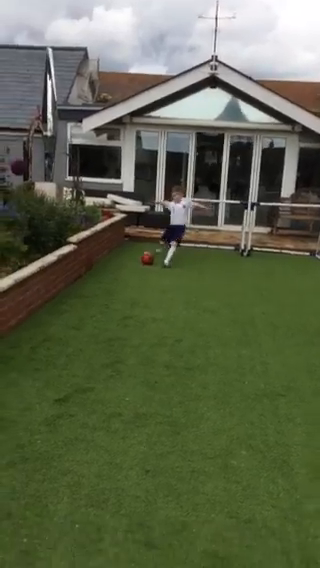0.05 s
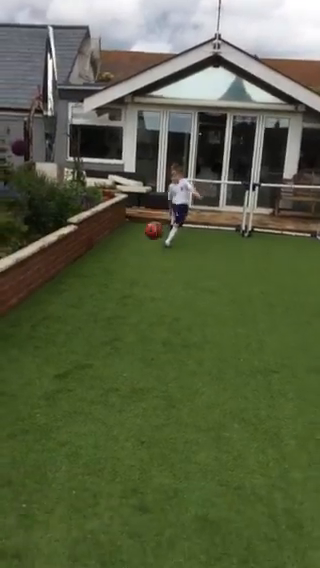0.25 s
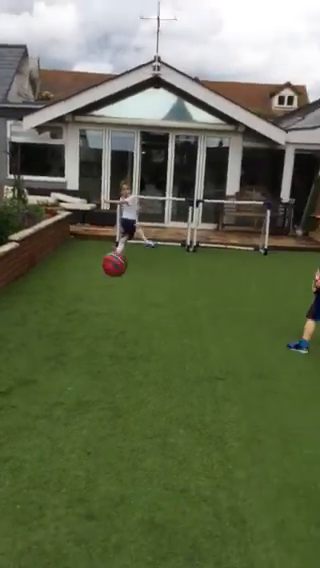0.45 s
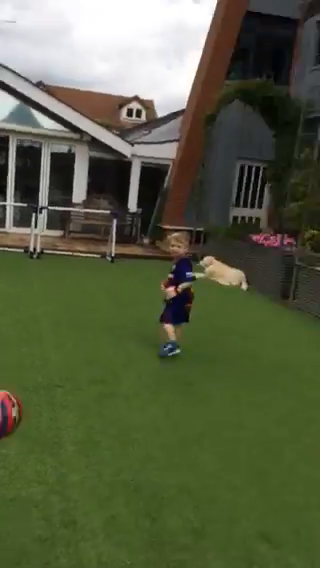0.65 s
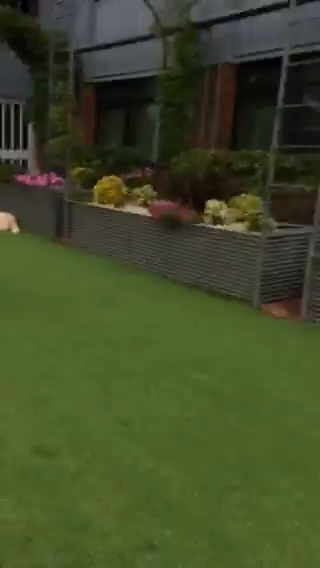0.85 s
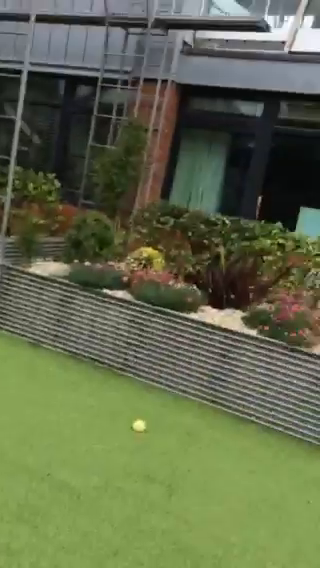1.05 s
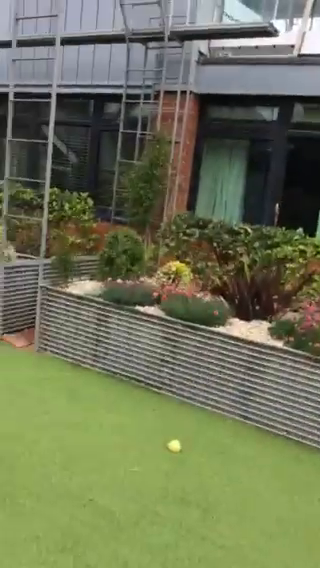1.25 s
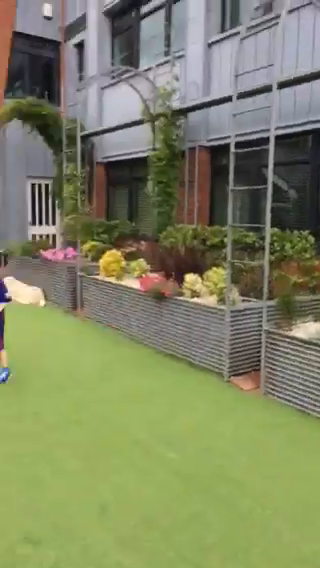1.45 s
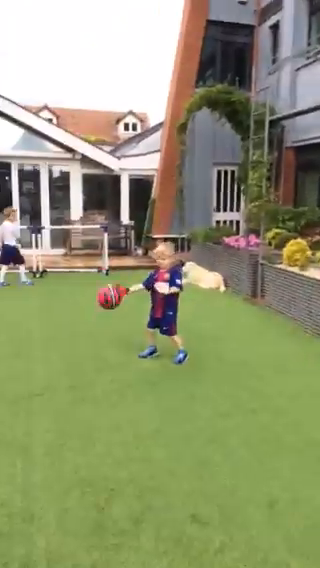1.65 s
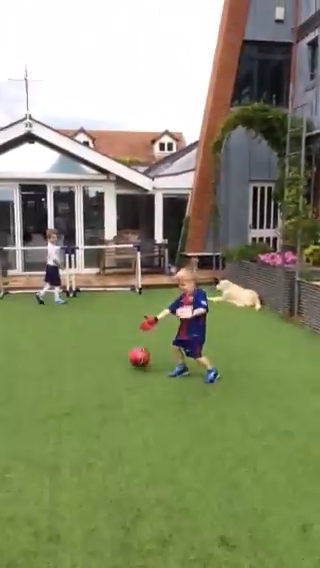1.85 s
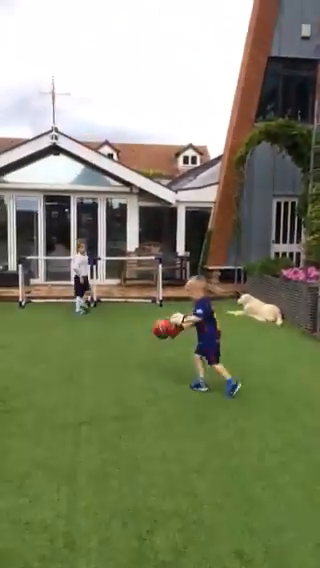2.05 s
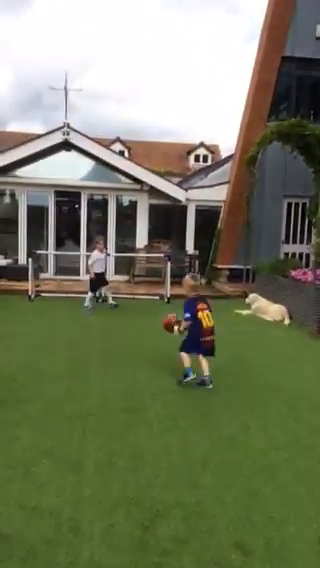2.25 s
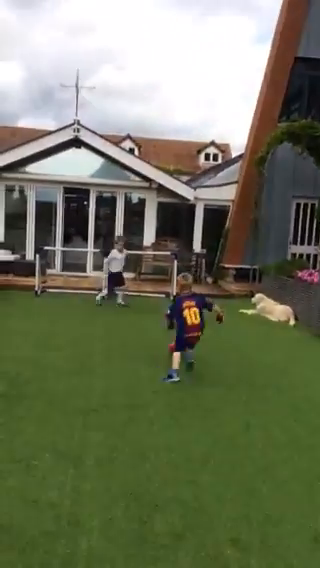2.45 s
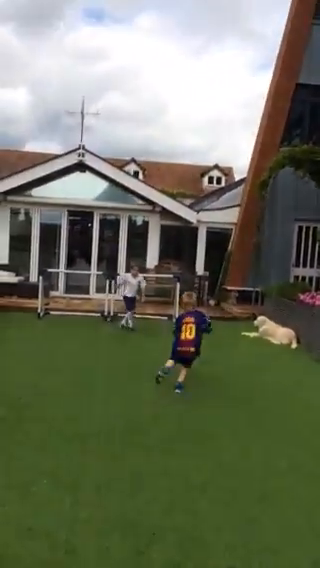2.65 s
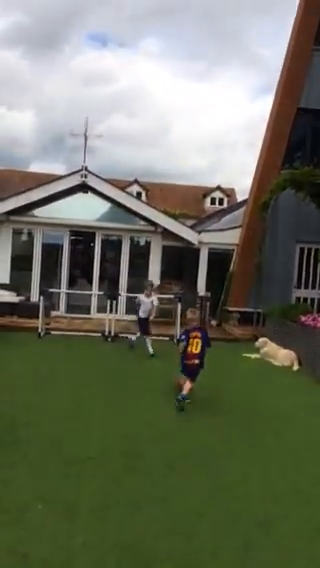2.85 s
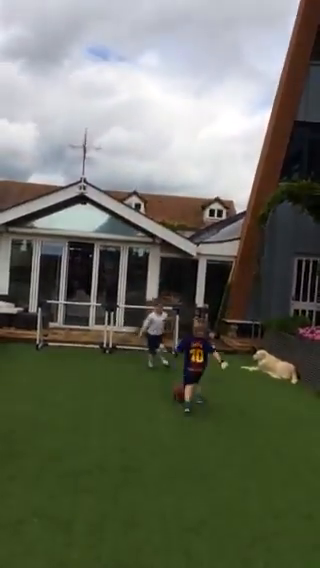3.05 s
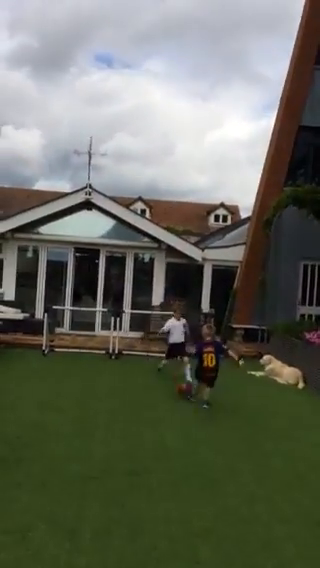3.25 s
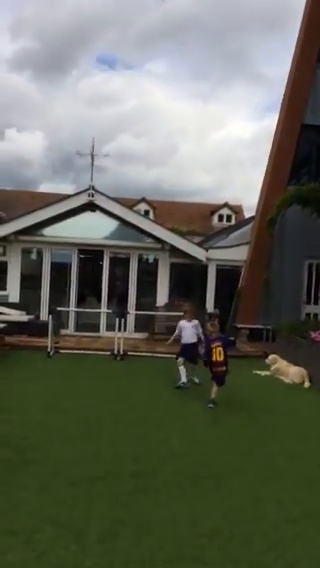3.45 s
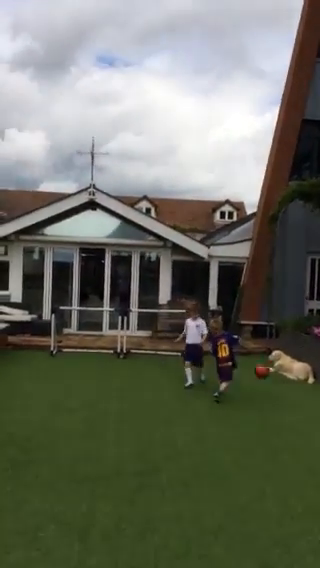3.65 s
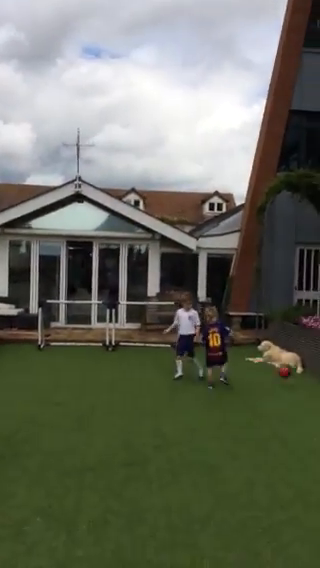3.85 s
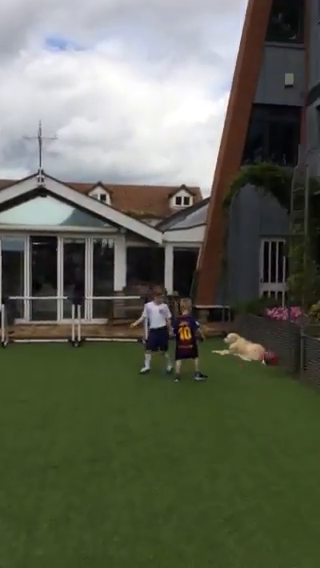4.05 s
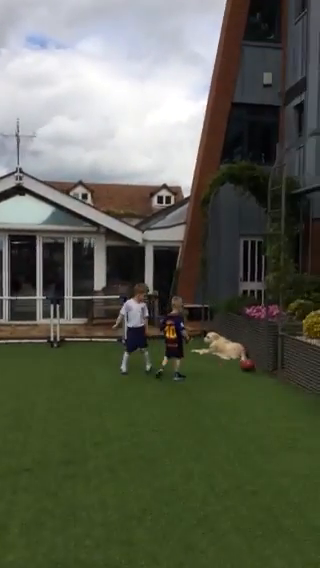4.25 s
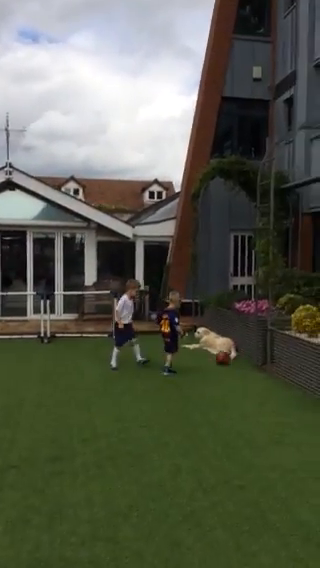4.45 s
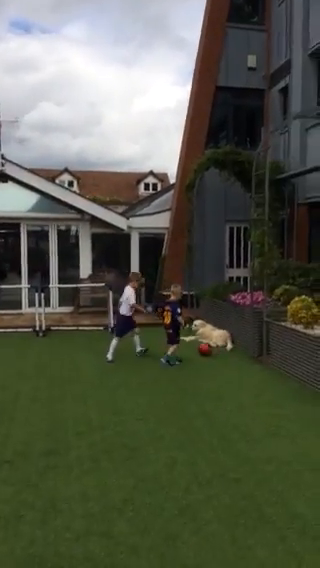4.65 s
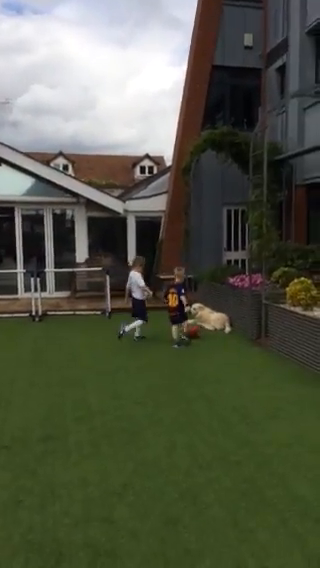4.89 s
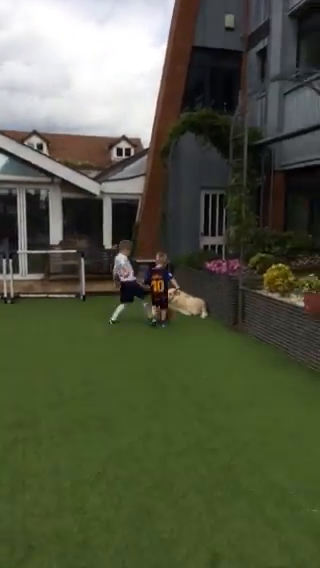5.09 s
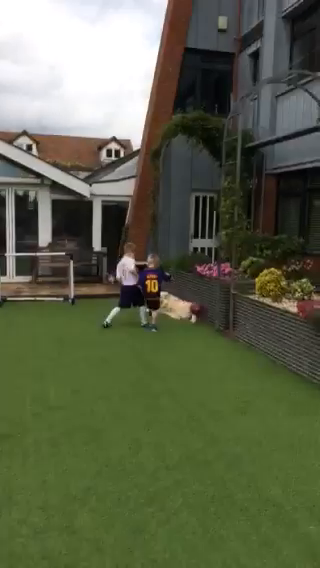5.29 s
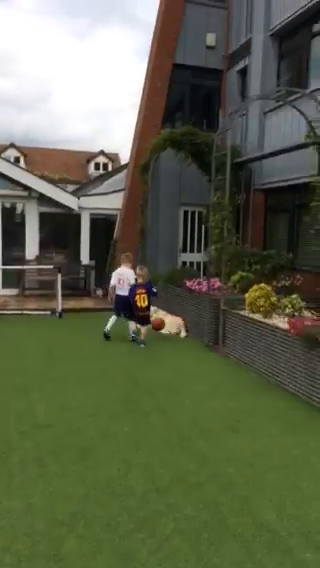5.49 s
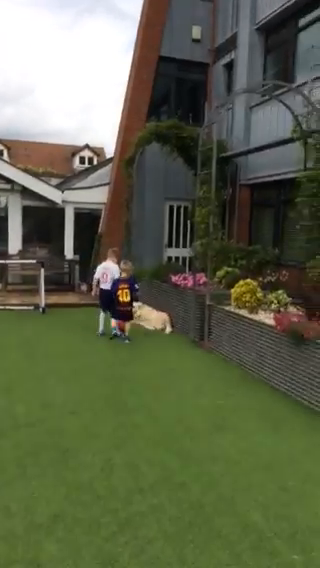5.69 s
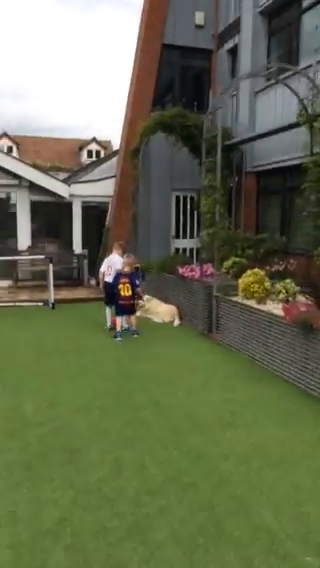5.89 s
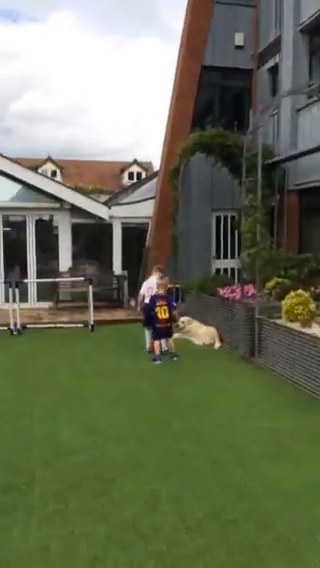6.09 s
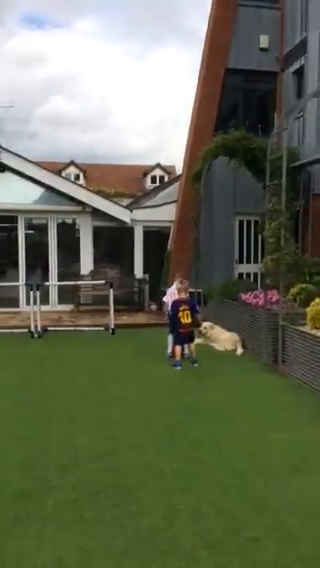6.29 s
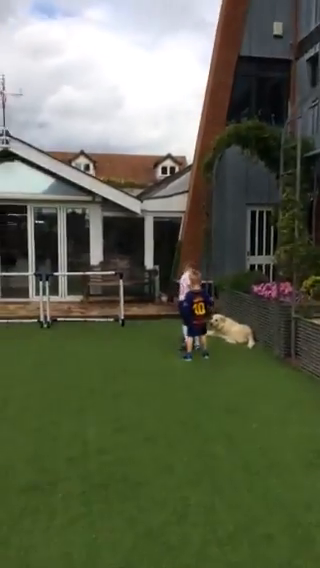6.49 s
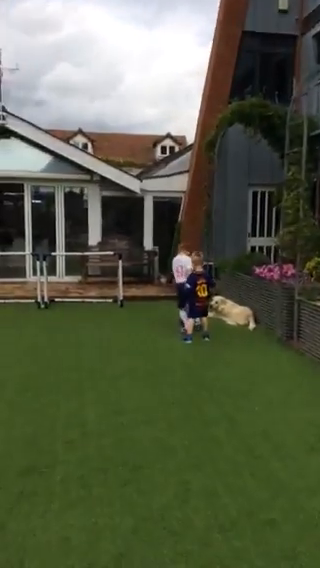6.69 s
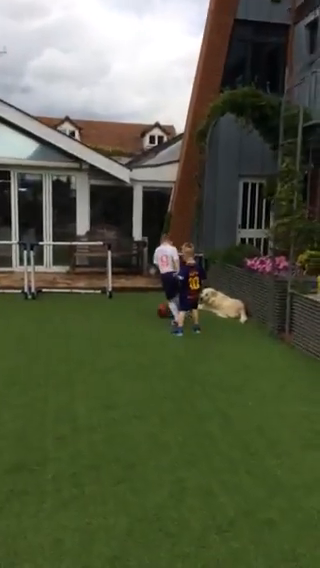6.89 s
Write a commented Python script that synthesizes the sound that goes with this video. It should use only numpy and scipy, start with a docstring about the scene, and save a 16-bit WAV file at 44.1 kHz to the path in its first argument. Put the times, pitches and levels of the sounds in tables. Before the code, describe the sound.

Hollow ball thumps and slaps on padded turf, the loudest about one second in, with light footsteps, scuffs and a distant chirping bird.

```python
"""Ball play in a walled garden

Children knock a small football about on artificial grass, heard through a hand-held phone.
Each kick adds a damped low thump, a slap of skin smacks and noise, and the ringing modes of the ball's air.
A filtered wall echo and decaying noise answer it, and enveloped low noise holds a rumble.
Feet pad as soft pulses and scuff as swells of grainy noise; a far bird sings in gliding sines
over a hush of shaped noise, with faint stray ticks of clothes and leaves."""
import sys
import numpy as np
from scipy import signal
from scipy.fft import rfft, irfft, next_fast_len
from scipy.io import wavfile

SR = 44100
rng = np.random.default_rng(int(sys.argv[2]) if len(sys.argv) > 2 else 0)


def waveform_to_disk(signal):
    """Save audio, clipped to [-1, 1], as 16-bit WAV at the path in sys.argv[1]."""
    frames = np.transpose(np.atleast_2d(signal))
    scaled = np.clip(frames, -1, 1) * 32767
    samples = np.round(scaled).astype(np.int16)
    wavfile.write(sys.argv[1], SR, samples)


N = 305613
TIME = np.arange(N) / SR  # s


def undb(db):
    """Level law: decibels to amplitude gain."""
    return 10 ** (np.asarray(db) / 20)


def unit(x):
    """Normalisation: scale to an rms of 1."""
    return x / np.sqrt(np.mean(x ** 2))


def log_interp(hz, points_hz, values):
    """Logarithmic pitch scale: read a curve on a log-frequency axis."""
    return np.interp(np.log(np.maximum(hz, 1)), np.log(points_hz), values)


def colour(x, points):
    """Linear filtering: weight the spectrum by a curve of (frequency [Hz], gain [dB])."""
    size = next_fast_len(len(x))
    hz = np.fft.rfftfreq(size, 1 / SR)
    gain = undb(log_interp(hz, *np.transpose(points)))
    return irfft(rfft(x, size) * gain, size)[:len(x)]


def click(db):
    """Minimum phase: the causal impulse that has a given level in each frequency bin."""
    cepstrum = irfft(np.log(undb(db)))
    half = len(cepstrum) // 2
    # folding the cepstrum onto positive times makes the impulse causal
    cepstrum[1:half] *= 2
    cepstrum[half + 1:] = 0
    return irfft(np.exp(rfft(cepstrum)))


def fade(t, t60):
    """Exponential decay: 60 dB are lost in t60 seconds."""
    return np.exp(-np.log(1000) * t / t60)


def add(out, s, x):
    """Superposition: mix x into out from time s on."""
    start = int(np.clip(s * SR, 0, len(out)))
    part = x[:len(out) - start]
    out[start:start + len(part)] += part


def walk(rate):
    """Random modulation: normal values, rate of them per second, joined by straight lines."""
    knots = rng.standard_normal(N // 100)
    return np.interp(TIME * rate, np.arange(len(knots)), knots)


def scattered(per_second):
    """Jittered succession: one time drawn at random within each equal slot."""
    slots = np.arange(int(N / SR * per_second))
    return (slots + rng.random(len(slots))) / per_second


# reverberation of the yard: (band centre [Hz], relative level [dB], late decay t60 [s])
YARD_BANDS = [(63.6, 10.5, 0.97), (145, -2, 0.76), (324, 1.5, 0.32), (988, -6.5, 0.6), (3080, -4, 0.3),
              (7000, -9, .3), (14000, -6.5, .22)]


def yard(build_s=0.0048, early_db=3, early_t60=0.32):
    """Diffuse reverberation: scatter from planters and house fronts builds up, then decays band by band."""
    t = TIME[:SR]
    hz = np.fft.rfftfreq(SR, 1 / SR)
    centres, levels, t60s = np.transpose(YARD_BANDS)
    noise = rfft(rng.standard_normal(SR))
    out = np.zeros(SR)
    for share, db, t60 in zip(np.eye(len(YARD_BANDS)), levels, t60s):
        build_up = 1 - np.exp(-(t / build_s) ** 2)
        decay = fade(t, t60) + undb(early_db) * fade(t, early_t60)
        shape = build_up * decay
        band = irfft(noise * log_interp(hz, centres, share), SR)  # neighbouring bands overlap
        out += undb(db) * band * shape / np.linalg.norm(shape)
    return out


# spectrum of the distant hush: (frequency [Hz], relative density [dB])
HUSH_SPECTRUM = [(15, -36), (25, 7), (58, 4), (157, -8), (263, -2), (326, -9.5), (545, -14), (677, -12.5),
                 (1040, -15), (1290, -15), (2760, -20.5), (6380, -27), (9070, -32), (14800, -32),
                 (16000, -43.5)]
# slow course of the hush: (time [s], level relative to HUSH_DB [dB])
HUSH_COURSE = [(0, 0.5), (0.6, 3), (1.3, -1), (2.4, 2.1), (3.0, 0.5), (4.1, -1.45), (4.9, 0.6), (6.1, -0.8),
               (6.9, 1.5)]
HUSH_DB = -61


def outdoors(sway_db=-0.4, treble_sway_db=1, treble_hz=2500):
    """Ambient noise: a distant hush slowly swells and thins, and its treble also wanders alone."""
    level_db = HUSH_DB + np.interp(TIME, *np.transpose(HUSH_COURSE)) + sway_db * walk(3)
    hush = unit(colour(rng.standard_normal(N), HUSH_SPECTRUM))
    high_pass = signal.butter(2, treble_hz, "high", fs=SR, output="sos")
    treble = signal.sosfiltfilt(high_pass, hush)
    rest = hush - treble
    return (rest + treble * undb(treble_sway_db * walk(7.5))) * undb(level_db)


# spectrum of the low air noise: (frequency [Hz], relative density [dB])
AIR_SPECTRUM = [(20, -8), (45, 14), (70, -3), (120, -2.5), (200, -24), (400, -58.5), (1000, -76.5),
                (4000, -96)]
# gusts on the microphone as the phone swings: (middle [s], half length [s], level [dB])
MICROPHONE_GUSTS = [(0.109, 0.038, -41.5), (0.738, 0.042, -39.5), (2.15, 0.3, -58), (2.56, 0.07, -44),
                    (3.211, 0.056, -43)]
RUMBLE_FLOOR_DB = -68.5  # always faintly there
# held between the walls after each thump; the level is relative to the thump's
RUMBLE_HELD_DB, RUMBLE_BUILD_S, RUMBLE_T60_S = -25, 0.031, 0.8


def rumble(flutter_db=2, thud_db=3, yard_share=0.29):
    """Energy addition: powers of floor, gusts and what thumps stir up add, and drive one fluttering noise."""
    t = TIME[:2 * SR]
    held = (1 - np.exp(-t / RUMBLE_BUILD_S)) * fade(t, RUMBLE_T60_S)
    # a kick that the yard answers strongly holds more rumble
    thumps = [(s, db + yard_share * yard_db) for s, db, *_, yard_db, echo_s in KICK_EVENTS]
    thumps += [(s, db + thud_db) for s, db, _ in SOFT_LANDINGS]
    power = np.full(N, undb(RUMBLE_FLOOR_DB) ** 2)
    for s, half_s, db in MICROPHONE_GUSTS:
        power += undb(db) ** 2 * np.exp(-((TIME - s) / half_s) ** 2)
    for s, db in thumps:
        add(power, s, (undb(db + RUMBLE_HELD_DB) * held) ** 2)
    air = unit(colour(rng.standard_normal(N), AIR_SPECTRUM))
    return air * np.sqrt(power) * undb(flutter_db * walk(60))


def rustle(per_second=9, db=-52, spread_db=3, yard_db=0):
    """Random impulses: clothes and leaves give off faint stray ticks of either sign, with reverberation."""
    chance = rng.standard_normal((2, N))
    happens = rng.random(N) < per_second / SR
    ticks = happens * np.sign(chance[0]) * undb(db + spread_db * chance[1])
    ticks = ticks + undb(yard_db) * signal.fftconvolve(ticks, yard())[:N]
    return colour(ticks, [(200, -4.5), (1200, 4.5), (4000, 2.0), (14000, 0)])


def thump(hz, t60=0.05, punch=0.82, punch_s=0.0016, squash=0.45):
    """Impact radiation: a quick squash and rebound makes a pressure pulse and a heavily damped low swing."""
    t = TIME[:SR // 4]
    u = t / punch_s - 2
    rebound = (1 - 2 * squash * u ** 2) * np.exp(-u ** 2 / 2) * (1 - np.exp(-t / 0.00016))
    swing = np.sin(2 * np.pi * hz * t) * fade(t, t60) * (1 - np.exp(-t / 0.0018))
    return swing + punch * rebound


# heavy footfalls and soft bounces: (time [s], thump level [dB], knock relative to thump [dB])
SOFT_LANDINGS = [(.494, -34, -24), (0.672, -45, 4), (.694, -29.5, -21), (0.736, -27.5, -34),
                 (0.865, -30, -16), (.89, -30, -24.5), (0.961, -31.5, 0), (1.156, -15, -9),
                 (2.546, -36, -36), (3.704, -40, -1), (3.891, -30, -16.5), (5.505, -30.5, -29)]
THUD_HZ = 84  # the padded turf gives every landing the same low note
# light steps: the children run at first, then settle round the ball, so that the level falls steadily
STEPS_PER_S, STEP_DB, SETTLE_DB_PER_S = 5.1, -43, -2.5
STEP_SPREAD_DB, STEP_KNOCK_DB = 2, -24.5


def thuds(steps, yard_db=-11, usual_db=-32, nearness=0.55, knock_s=0.00074, knock_after_s=0.0025):
    """Cushioned impact: a thump, and a dull knock where the pile bottoms out; loud ones are near and dry."""
    out, scatter = np.zeros((2, N))
    u = (TIME[:SR // 4] - knock_after_s) / knock_s
    knock = (1 - u ** 2) * np.exp(-u ** 2 / 2)
    body = thump(THUD_HZ, t60=0.082, punch=0.52, punch_s=0.0018, squash=0.14)
    light = []
    for s in steps:
        step_db = STEP_DB + SETTLE_DB_PER_S * s + STEP_SPREAD_DB * rng.standard_normal()
        light.append((s, step_db, STEP_KNOCK_DB))
    for s, db, knock_db in SOFT_LANDINGS + light:
        landing = undb(db) * (body + undb(knock_db) * knock)
        add(out, s, landing)
        add(scatter, s, undb(yard_db - nearness * max(db - usual_db, 0)) * landing)
    return out + signal.fftconvolve(scatter, yard())[:N]


# spectrum of brushed turf before the tilt of each scuff: (frequency [Hz], relative density [dB])
TURF_SPECTRUM = [(100, -19), (230, 2.5), (370, 5), (600, 0), (1200, 2), (2200, -5), (4000, -11.5),
                 (8000, -20), (15000, -23.5)]
# shoes and ball brushing the turf:
# (time [s], rise [s], fade to 1/e [s], direct level [dB], brightness tilt [dB per octave])
TURF_SCUFFS = [(.11, 0.038, 0.083, -59.5, 0), (.452, .01, 0.056, -56, 2), (.667, 0.0061, 0.036, -63, 1),
               (.788, 0.0048, 0.031, -50, -0.5), (0.945, 0.0057, 0.0076, -29, -1),
               (1.412, 0.028, 0.066, -52, -0.9), (3.095, 0.015, 0.015, -56, 3.5),
               (3.893, .0026, 0.0085, -55, 0), (4.2843, 0.0015, 0.0046, -47, 4),
               (5.135, .002, .004, -50.5, 3), (5.146, .006, 0.03, -52.5, 2), (5.493, 0.0043, 0.016, -53, 0),
               (5.95, .06, 0.067, -60.5, -.5), (6.346, 0.0011, .011, -56.5, 0.5)]
# the brush of each light step
STEP_BRUSH_DB, STEP_BRUSH_RISE_S, STEP_BRUSH_FADE_S, STEP_BRUSH_TILT_DB = -70.5, 0.014, 0.055, 2


def scuffs(steps, yard_db=-8, grain_db=4.5, tuft_db=2.5):
    """Friction noise: plastic blades flick past a sole in a short swell of uneven grains that come in tufts."""
    out, t = np.zeros(N), TIME[:SR // 2]
    light = []
    for s in steps:
        brush_db = STEP_BRUSH_DB + STEP_SPREAD_DB * rng.standard_normal()
        light.append((s, STEP_BRUSH_RISE_S, STEP_BRUSH_FADE_S, brush_db, STEP_BRUSH_TILT_DB))
    for s, rise_s, fade_s, db, tilt_db in TURF_SCUFFS + light:
        grain_sizes = np.repeat(rng.standard_normal(len(t)), 20)[:len(t)]  # each lasts 20 samples
        tufts = walk(156.9)[:len(t)]
        sizes = undb(grain_db * grain_sizes + tuft_db * tufts)
        tilted = [(hz, level + tilt_db * np.log2(hz)) for hz, level in TURF_SPECTRUM]
        grains = colour(sizes * rng.standard_normal(len(t)), tilted)
        swell = np.minimum(t / rise_s, 1) * np.exp(-np.maximum(t - rise_s, 0) / fade_s)
        add(out, s, undb(db) * unit(grains) * swell)
    return out + undb(yard_db) * signal.fftconvolve(out, yard())[:N]


# modes of the ball's shell and the air inside it: (mean frequency [Hz], relative level [dB], t60 [s])
BALL_MODES = [(368, 2, 0.039), (840, -9.5, 0.052), (1316, 3, 0.038), (2110, -3, 0.016), (2607, 2, 0.032),
              (3400, -17.5, 0.027), (4425, -11, 0.0092)]
# spectrum of the slap before the hardness of each blow: (frequency [Hz], gain [dB])
SLAP_SPECTRUM = [(100, -14), (250, 7.5), (450, 6), (750, 13), (1400, 8), (2000, 4.5), (4500, 0),
                 (8000, -0.5), (11000, -7.5), (16000, -17.5)]


def slap(knock_db, bite_db, sizzle_db, smack_s, weaker=0.72, slower=1.25, ping_db=-37,
         crush_db=-22, crush_t60=0.014, count=4):
    """Modal excitation: the skin smacks flat, crushes grass blades and rings the air in the ball."""
    t = TIME[:SR // 4]
    hit = undb(crush_db) * rng.standard_normal(len(t)) * fade(t, crush_t60)
    for k in range(count):  # each smack is weaker and comes after a longer gap
        add(hit, smack_s * k ** slower, np.array([-weaker ** k]))
    for hz, db, t60 in BALL_MODES:
        mode_hz = hz * (1 + 0.033 * rng.standard_normal())
        hit += undb(ping_db + db) * np.sin(2 * np.pi * mode_hz * t) * fade(t, t60)
    bins = np.fft.rfftfreq(2048, 1 / SR)
    hardness = log_interp(bins, [400, 1000, 2500, 4000, 8000], [knock_db, 0, bite_db, bite_db, sizzle_db])
    response = click(log_interp(bins, *np.transpose(SLAP_SPECTRUM)) + hardness)
    return signal.fftconvolve(hit, response)[:len(t)]


# kicks and bounces: (time [s], thump level [dB], thump pitch [Hz], slap level before slap_gain_db [dB],
# knock below 400 Hz [dB], bite near 3 kHz [dB], sizzle from 8 kHz up [dB],
# gap between the skin's first smacks [s], yard level [dB], wall echo delay [s])
KICK_EVENTS = [(0.2407, -17, 88, -16.5, 10, -3, -5.5, 0.00071, 5, 0.023),
               (1.0229, -2, 78.6, 1, 4.5, 2, -3.5, 0.00089, -16.5, 0.014),
               (1.9621, -26.5, 106, -22, 6, -11, -16.5, 0.00057, -2.5, .024),
               (3.3738, -22, 177, -17, 8.5, -8.5, -3.5, 0.00017, -2.5, 0.026),
               (3.4944, -17, 67, -21.5, 7, 2, 0.5, 0.00048, 5.5, .075),
               (3.5160, -30, 97.7, -17.5, 6.5, -11, -15, 0.0013, 3, 0.029),
               (3.6276, -25, 81.6, -13, -6, -4.5, -16.5, .00082, 7, 0.00425),
               (5.197, -27, 103, -25, -1.5, -1, 9, 0.000084, 2, .024),
               (5.4113, -24, 85.7, -14, -4, -6.5, -8, 0.0012, -2.5, .029)]
# the nearest wall answers every kick, more strongly where the yard does too (dB, dB per dB of yard)
WALL_ECHO_DB, WALL_ECHO_SLOPE = -9.5, 0.25


def kicks(slap_gain_db=5, wall_hz=1300, boom_db=-4, count=3):
    """Reflection: each blow arrives directly, dulled off the nearest wall, and scattered round the yard."""
    out = np.zeros(N)
    low_pass = signal.butter(2, wall_hz, fs=SR, output="sos")
    for s, thump_db, hz, slap_db, knock_db, bite_db, sizzle_db, smack_s, yard_db, echo_s in KICK_EVENTS:
        low = undb(thump_db) * thump(hz)
        force = undb(slap_db + slap_gain_db)
        blow = low + force * slap(knock_db, bite_db, sizzle_db, smack_s)
        add(out, s, blow)
        echo = signal.sosfilt(low_pass, blow)
        add(out, s + echo_s, undb(WALL_ECHO_DB + WALL_ECHO_SLOPE * yard_db) * echo)
        for stretch in np.linspace(0.5, 2, count):  # in other directions the smacks are spaced differently
            side_slap = slap(knock_db, bite_db, sizzle_db, stretch * smack_s)
            aside = undb(boom_db) * low + force * side_slap
            add(out, s, undb(yard_db) / np.sqrt(count) * signal.fftconvolve(aside, yard()))
    return out


# clearest notes of a far songbird:
# (start [s], length [s], middle pitch [Hz], level before the direct and scattered gains [dB])
BIRD_NOTES = [(1.65, .08, 5650, -63.5), (2.10, 0.19, 4900, -66.5), (2.31, 0.11, 4250, -64),
              (2.54, .07, 5950, -64), (2.69, .06, 3620, -59), (3.07, .1, 5500, -65),
              (3.99, 0.16, 4400, -60.5), (4.43, 0.12, 5500, -64.5), (4.68, 0.031, 5250, -63),
              (4.95, .08, 3700, -60.5), (5.36, .07, 5400, -63), (5.86, 0.15, 4500, -69.5),
              (6.44, 0.13, 4500, -63), (6.84, 0.079, 5750, -60.5)]
# all notes slur downwards by this times their length squared, so that short ones are nearly level
SLUR_HZ_PER_S2 = 83000
# fainter notes twitter in between; pitch and length are drawn from these ranges
TWITTER_PER_S, TWITTER_DB, TWITTER_HZ, TWITTER_S = 3.8, -68, (3780, 6300), (0.03, 0.054)


def bird(warble_hz=80, trill=0.28, direct_db=-6, scatter_db=-0.5):
    """Frequency modulation: warbled gliding whistles from beyond the roofs, heard mostly by their echoes."""
    out = np.zeros(N)
    twitter = []
    for s in scattered(TWITTER_PER_S):
        twitter.append((s, rng.uniform(*TWITTER_S), rng.uniform(*TWITTER_HZ), TWITTER_DB))
    for s, length, middle_hz, db in BIRD_NOTES + twitter:
        u = np.linspace(0, 1, max(int(length * SR), 2))
        fall_hz = SLUR_HZ_PER_S2 * length ** 2
        # the wider a note sweeps, the more it trills
        warble = trill * np.sin(2 * np.pi * warble_hz * length * u) * rng.uniform(0.64, 1)
        hz = middle_hz + fall_hz * (0.5 - u + warble)
        whistle = np.sin(2 * np.pi * np.cumsum(hz) / SR)
        add(out, s, undb(db) * np.sin(np.pi * u) * whistle)
    echoes = signal.fftconvolve(out, yard(build_s=0.019, early_db=-14.5))[:N]
    return undb(direct_db) * out + undb(scatter_db) * echoes


def scene():
    """Superposition: all the garden's sounds add in one channel."""
    steps = scattered(STEPS_PER_S)
    air = outdoors() + rumble() + rustle()
    feet = thuds(steps) + scuffs(steps)
    return (air + feet + kicks() + bird())[None]


def record(dry, low_cut_hz=46, top_hz=16200, ceiling=0.62, knee=6):
    """Band limiting and saturation: the phone thins deep bass, rounds off hard peaks and cuts the top."""
    high_pass = signal.butter(2, low_cut_hz, "high", fs=SR, output="sos")
    thinned = signal.sosfiltfilt(high_pass, dry)
    rounded = thinned / (1 + np.abs(thinned / ceiling) ** knee) ** (1 / knee)
    low_pass = signal.ellip(8, 0.2, 70, top_hz, fs=SR, output="sos")
    return signal.sosfilt(low_pass, rounded)


dry = scene()
out = record(dry)
waveform_to_disk(out)
```